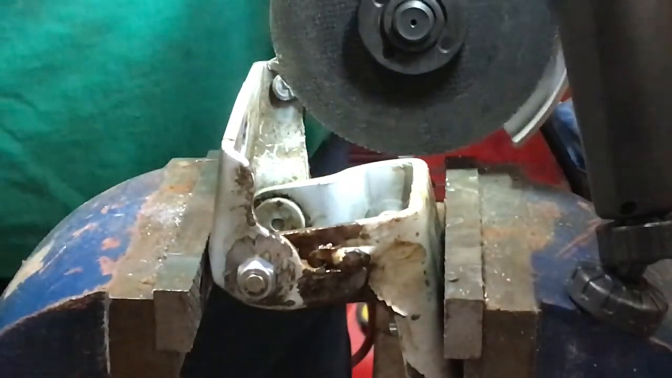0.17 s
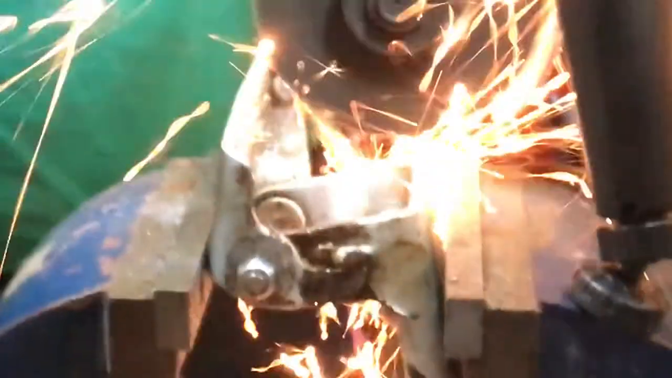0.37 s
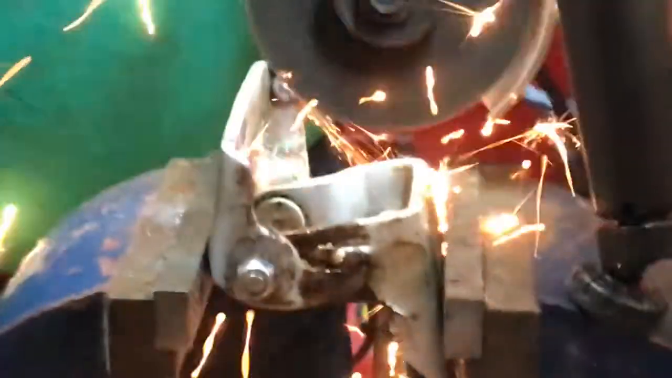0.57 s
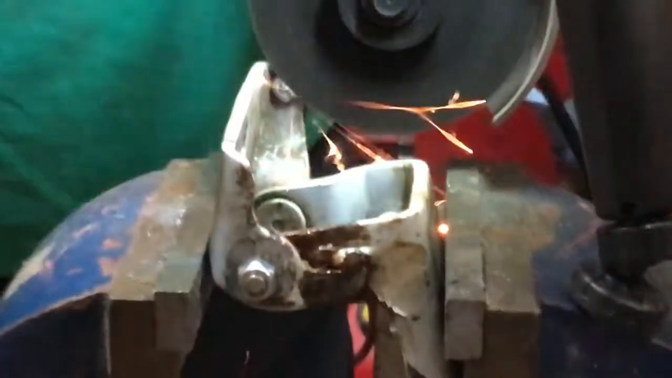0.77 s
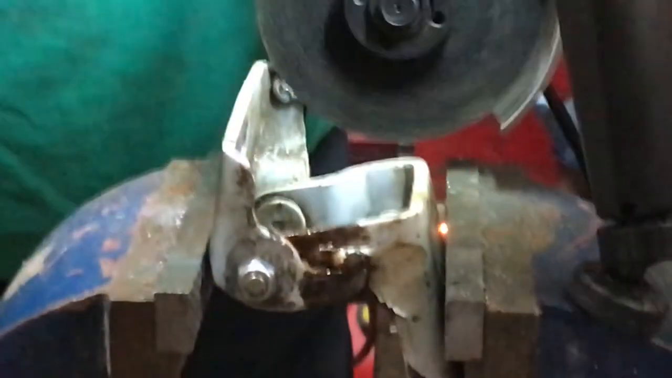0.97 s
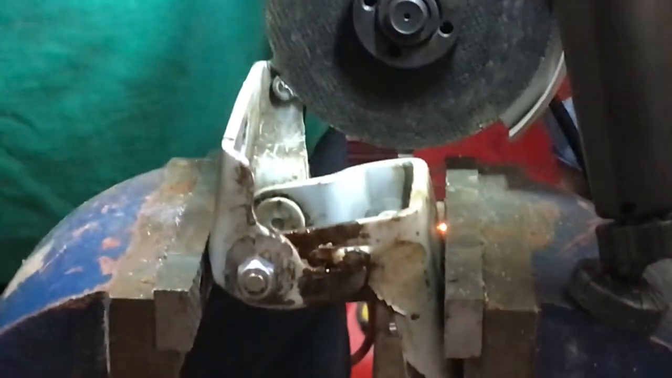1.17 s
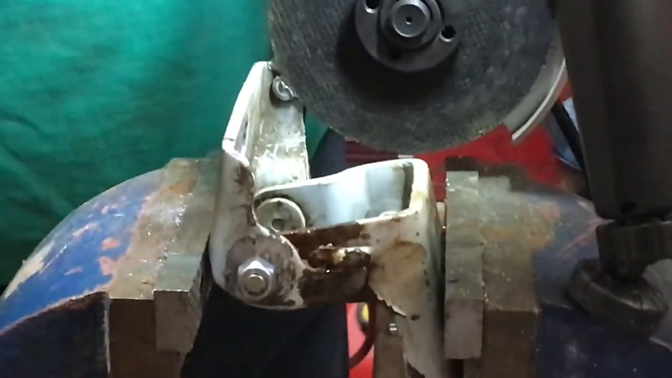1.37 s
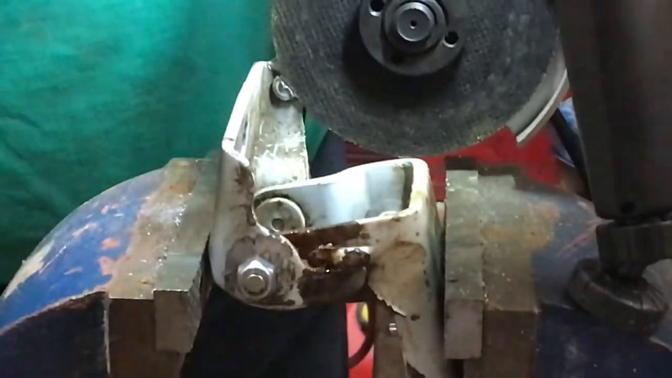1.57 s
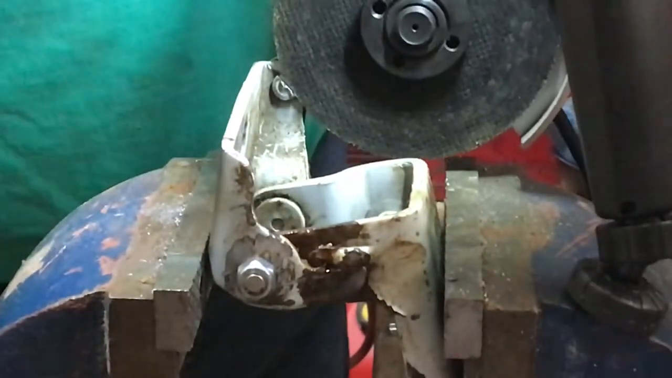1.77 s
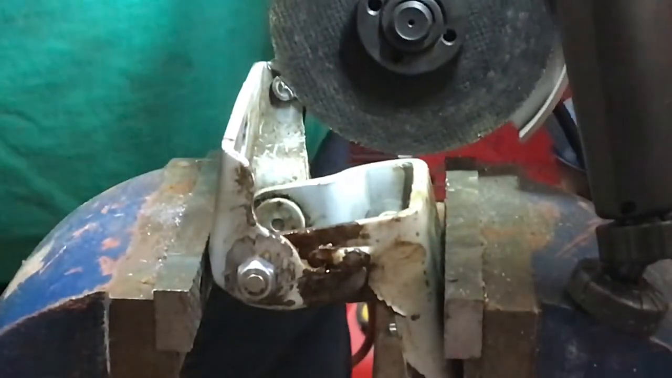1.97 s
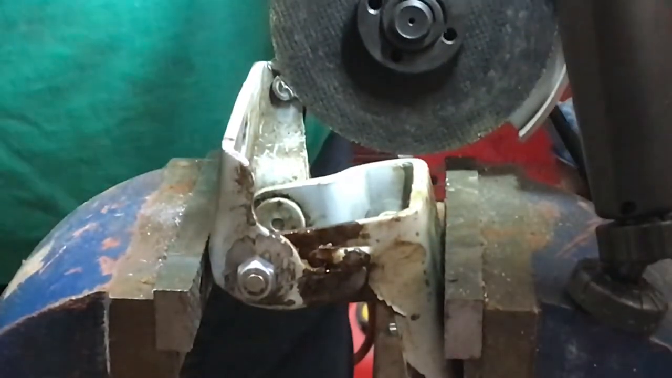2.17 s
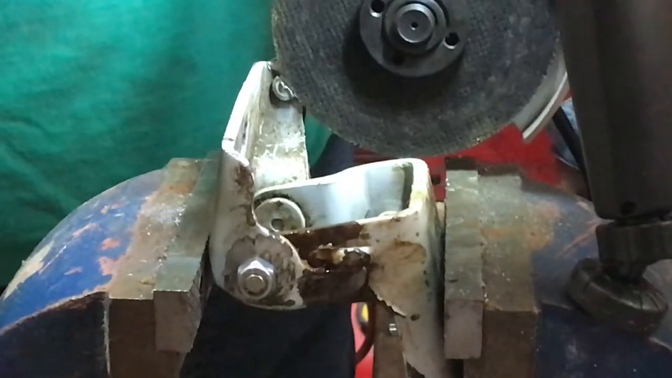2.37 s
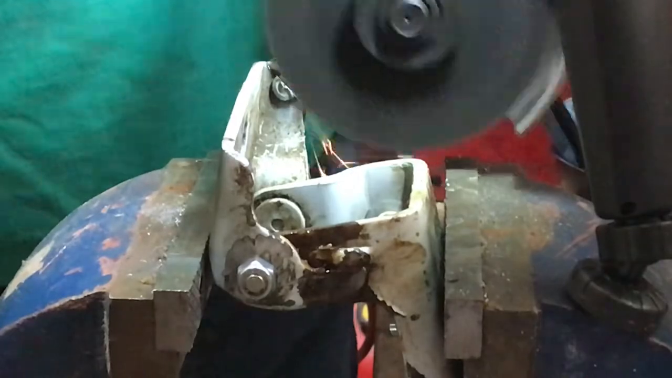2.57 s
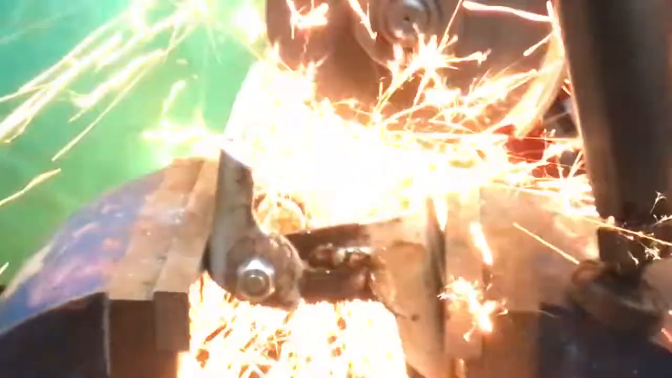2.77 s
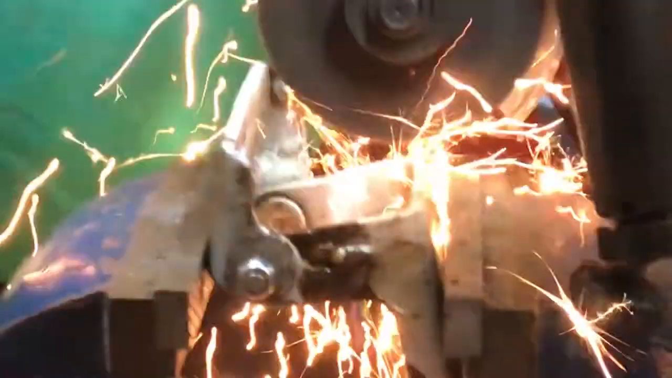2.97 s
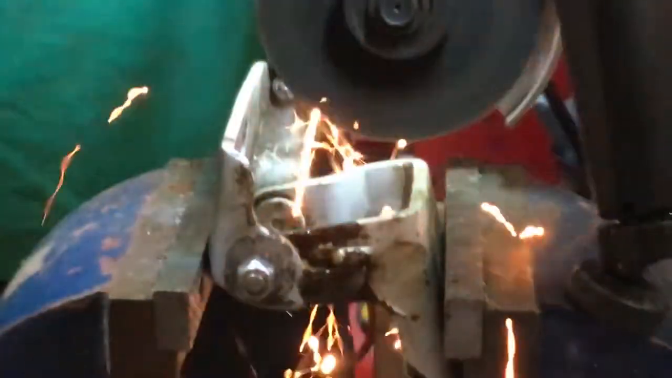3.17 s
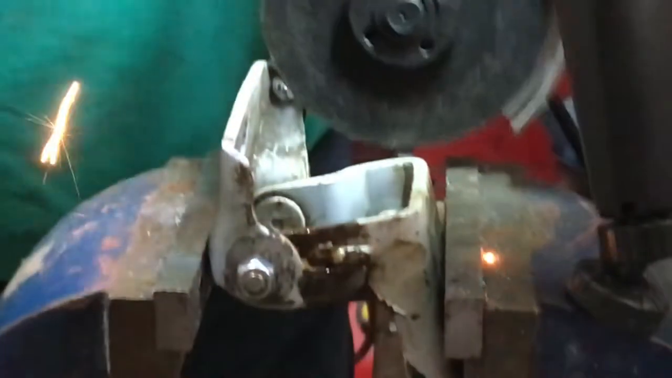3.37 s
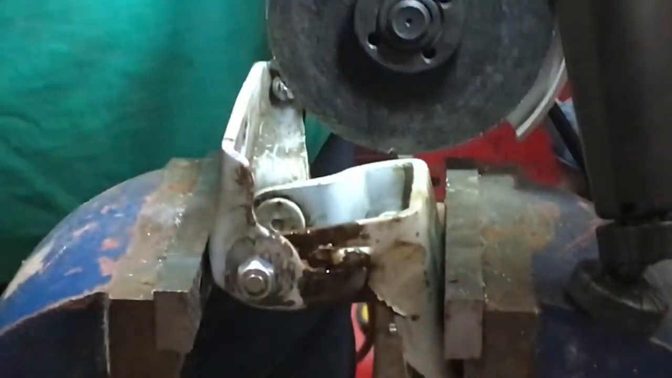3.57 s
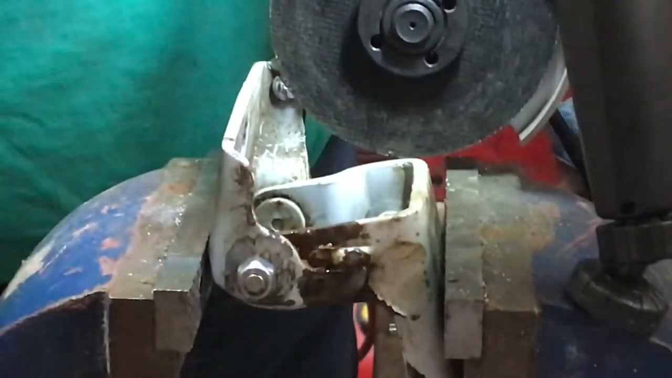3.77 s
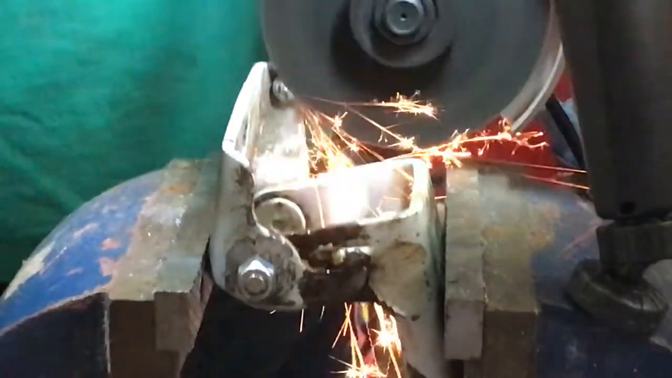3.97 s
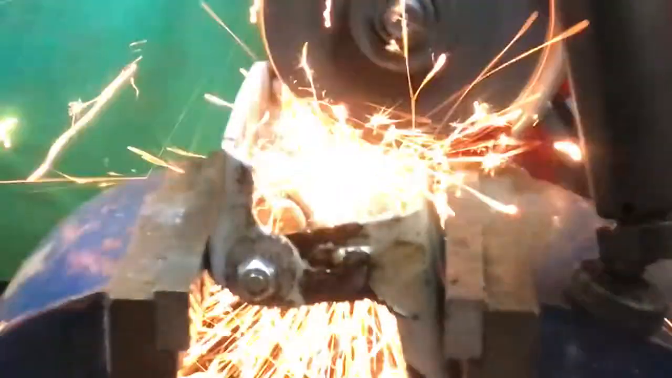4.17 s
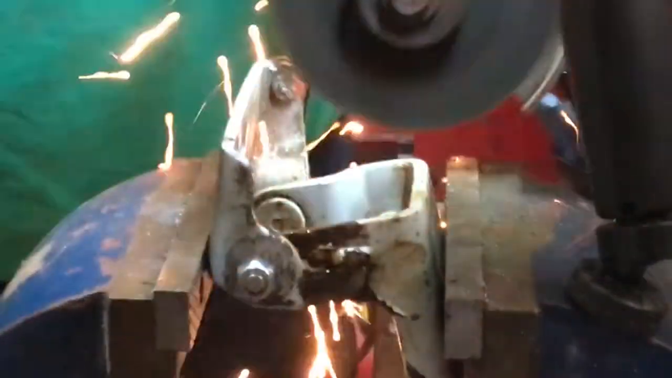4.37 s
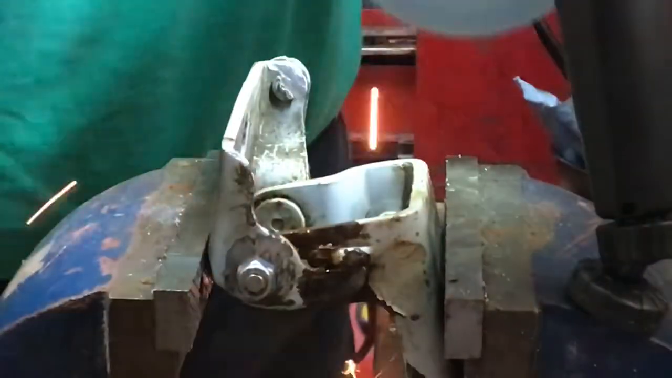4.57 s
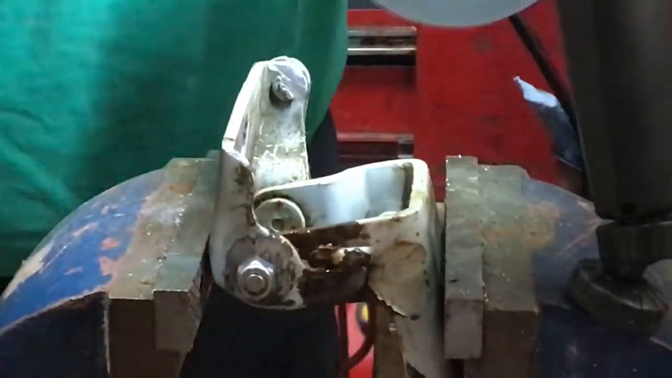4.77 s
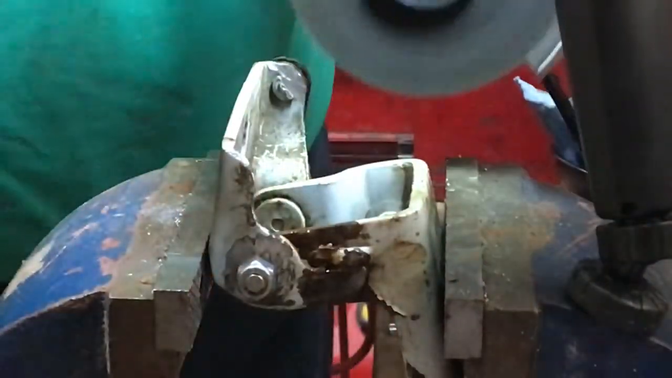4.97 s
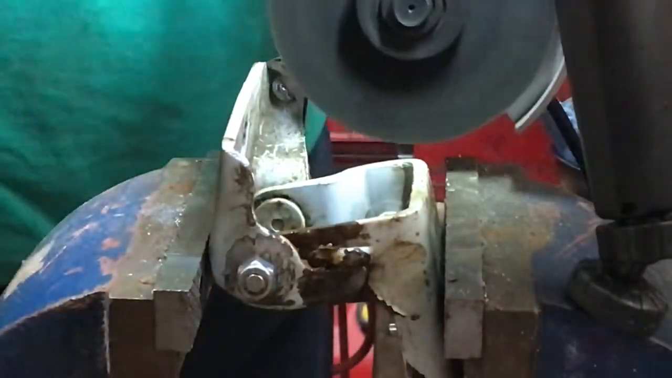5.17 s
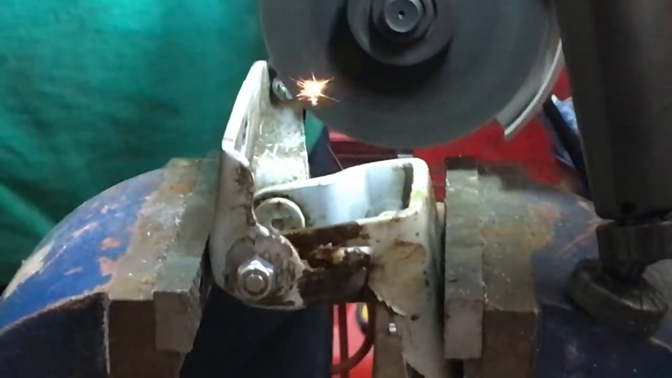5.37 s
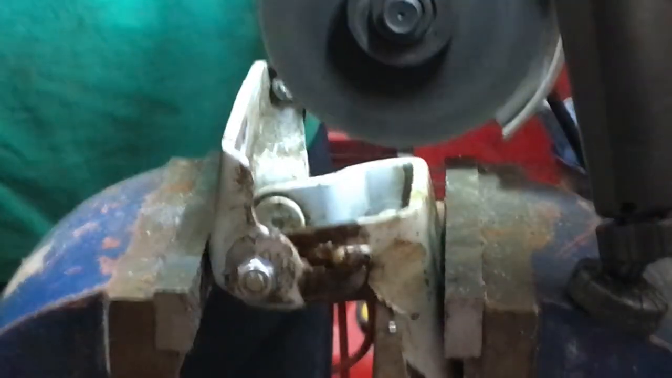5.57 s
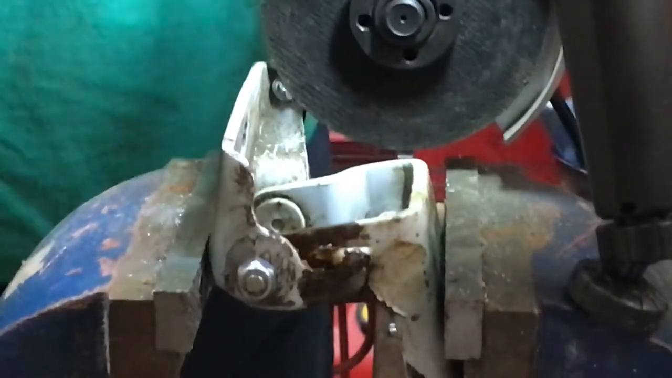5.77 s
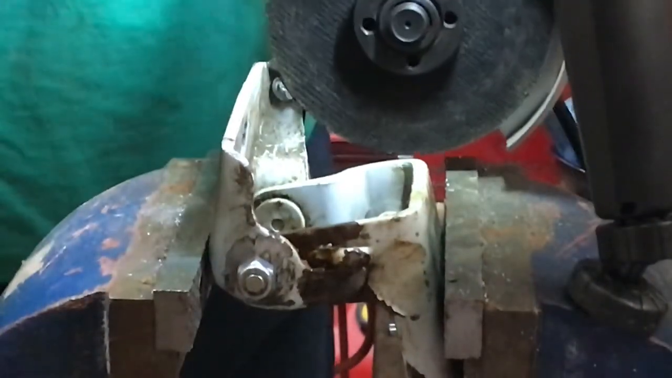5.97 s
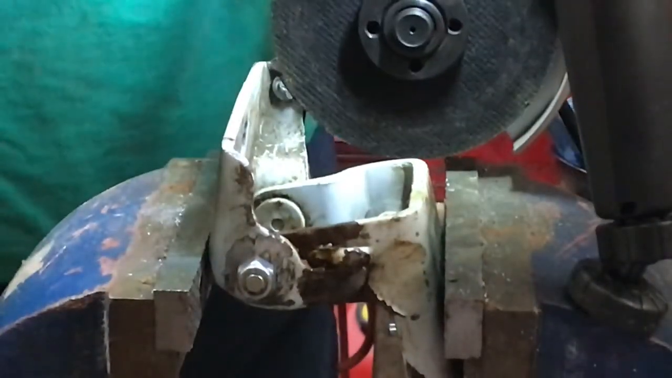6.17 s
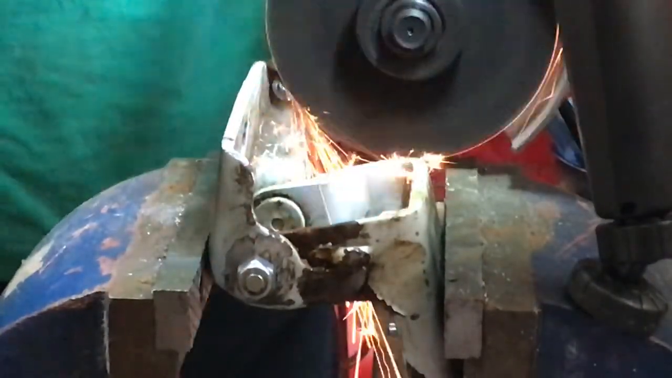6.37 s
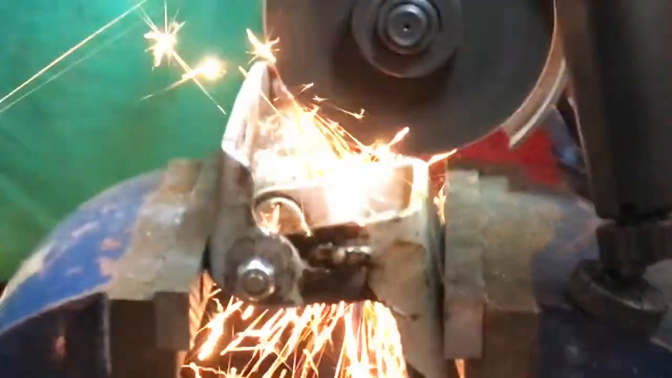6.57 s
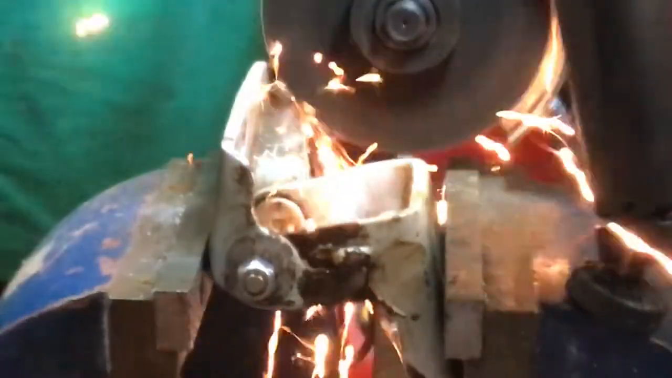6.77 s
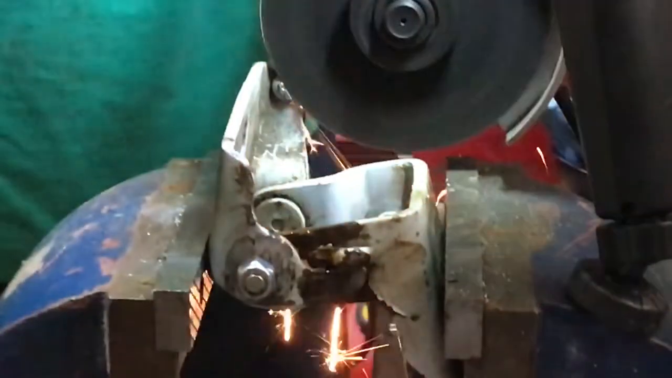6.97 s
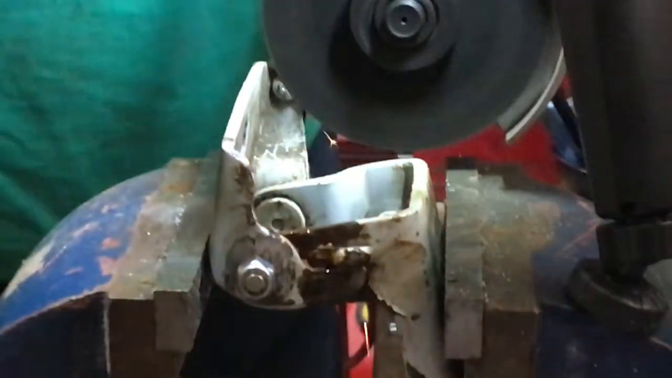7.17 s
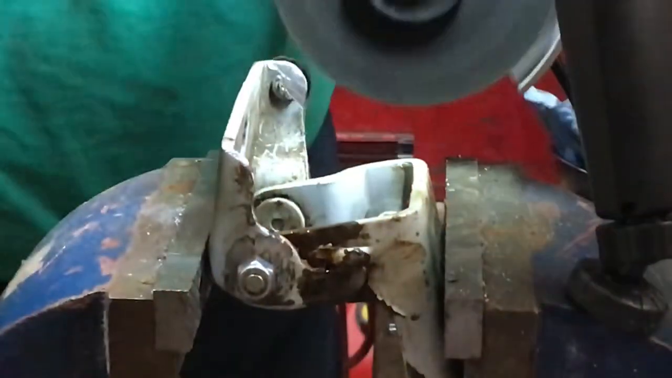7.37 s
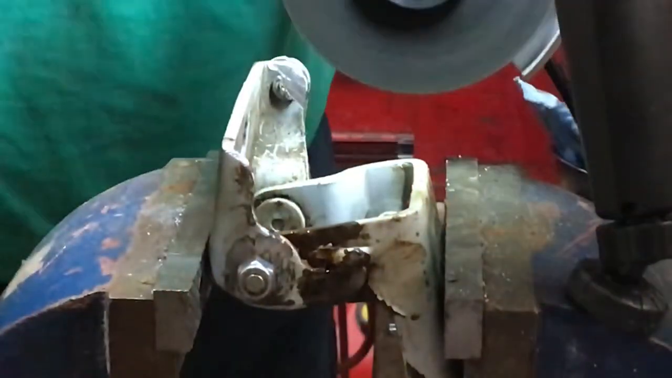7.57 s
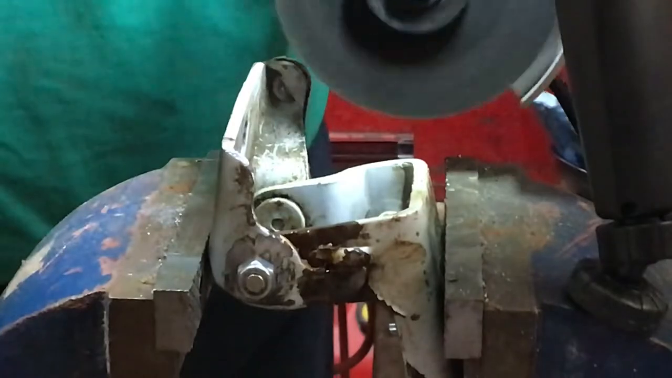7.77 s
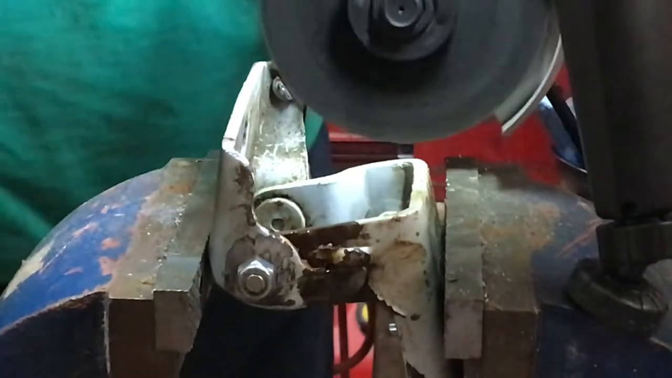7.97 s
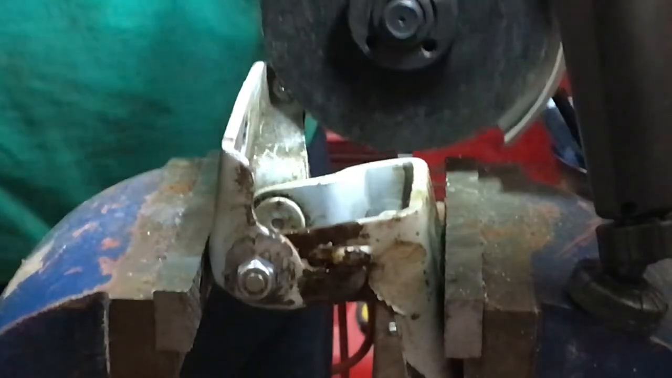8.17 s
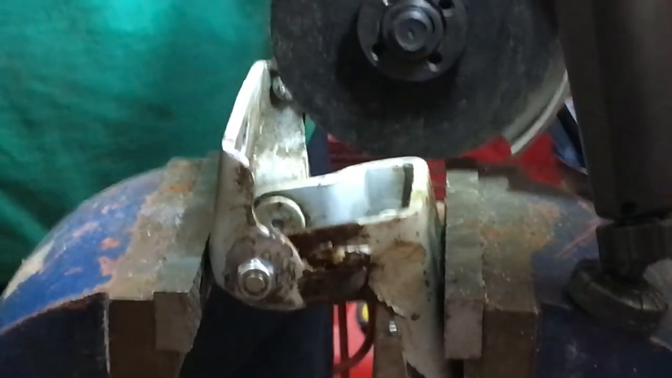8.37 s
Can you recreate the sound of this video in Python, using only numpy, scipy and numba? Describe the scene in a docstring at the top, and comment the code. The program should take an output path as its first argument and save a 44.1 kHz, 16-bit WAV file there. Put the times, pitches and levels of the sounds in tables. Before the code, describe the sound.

An angle grinder wheel rasps hard into a steel pin in short harsh bursts, each fading, with pauses, slowing whirr and rattling gears between.

```python
"""In a small workshop with mains hum, an angle grinder, pulled on briefly, meets a steel pin in a vice.
Grit strikes are filtered by wandering pin resonances, swell with each turn and fade through a push.
Lifted off, the slowing tool whirrs, hums and whines, and backlash in its gears excites the case.
Bites, bumps, ticks and thuds are shaped impulses; vice modes and a diffuse room tail ring on."""
import sys
import numpy as np
from scipy import signal
from scipy.fft import rfft, irfft
from scipy.io import wavfile
from scipy.ndimage import uniform_filter1d
from numba import njit

SR = 44100
rng = np.random.default_rng(int(sys.argv[2]) if len(sys.argv) > 2 else 0)


def dump(signal):
    """Clip the signal to [-1, 1] and save it as 16-bit WAV at the path in sys.argv[1]."""
    limited = np.clip(np.atleast_2d(signal).T, -1, 1)
    pcm = np.round(limited * 32767).astype(np.int16)
    wavfile.write(sys.argv[1], SR, pcm)


N = 370881

# wheel on steel: (touch [s], lift [s], level [dB], fade [dB/s], attack [ms],
#                  bench shake against the level [dB], low end [dB], release [dB/s])
PUSHES = [(0.216, 1.005, -7, 24.5, 17.3, -25.5, 1, 390), (2.594, 3.331, -8, 23, 6.5, -26, 1, 402),
          (3.96, 4.39, -7, 27.5, 18.6, -29.5, -1, 316), (5.298, 5.726, -20.5, -1.5, 8.7, -20.5, -1, 302),
          (6.365, 7.323, -8.5, 16.5, 12.6, -32, -2.5, 295)]
# free-running tool: (start [s], end [s], whirr level [dB], knock treble at the start [dB], low drone [dB])
COAST = [(4.425, 5.324, -36, -0.5, 2.5), (7.347, 8.037, -40.5, -7.5, -1)]
# smooth spectrum of the cut: (frequency [Hz], relative density [dB per Hz])
CUT_SPECTRUM = [(200, -38), (350, -27), (900, -21), (1700, -18.5), (3200, -7), (5000, -19), (7600, -22),
                (8700, -21), (15500, -26)]
# resonances of wheel, guard and gear case: (frequency [Hz], nominal width [Hz], level [dB])
TOOL_MODES = [(780, 170, -6), (1300, 90, -15), (2280, 260, -5), (2900, 200, -4), (3350, 220, -2),
              (4210, 40, -6), (4650, 220, -6), (5320, 200, -9), (8690, 250, -12), (10000, 350, -10)]
# resonances of the bench: (frequency [Hz], nominal width [Hz], level [dB])
BENCH_MODES = [(68.6, 21, 1), (122.5, 30, 2), (545, 250, -5.5)]


def grinding(t, turn, bite):
    """Amplitude modulation by rotation: the wheel's high spot varies the cut and shakes the bench."""
    uneven_db = 2
    push, shaking, low_db = pressure(t)
    high_spot = np.cos(turn) + 0.82 * np.cos(2 * turn + 1.) + 0.53 * walk(150)
    strength = undb(uneven_db * high_spot + 1.5 * walk(30)) * push
    force = grit(2.38) * strength + undb(-3.5) * bite
    sound = steel(t, force)
    shake = (np.cos(turn) + 10.0 * rng.standard_normal(N)) * undb(4.0 * walk(21)) * shaking
    # the low end comes in lumps
    growl = band(sound, 360, 1100) * undb(2.4 * walk(14) + low_db)
    # lighter contact is duller
    push_db = np.maximum(20 * np.log10(push), -30)
    treble = band(sound, 5500, 15040) * undb(0.18 * push_db + 5.0)
    bench = resonate(shake + undb(-27.0) * bite, BENCH_MODES)
    return growl + band(sound, 1100, 6360) + treble + bench


def pressure(t):
    """Contact-force envelopes of cut, shake and low end: quick touch, hold, steady decay, quick lift."""
    # the hand eases off: (time [s], depth [dB], half length to 1/e [ms])
    eases = [(0.428, 3.5, 30), (0.97, 4.5, 73), (4.163, 4.5, 30), (4.268, 5.5, 8.6), (7.28, 4, 21)]
    hold_s = 0.12
    eased_db = sum(depth_db * np.exp(-(1000 * (t - s) / half_ms) ** 2) for s, depth_db, half_ms in eases)
    push, shake, low_db = np.full(N, 1e-6), 0, 0
    for touch, lift, db, fade, ms, shake_db, growl_db, release in PUSHES:
        fading_db = fade * np.maximum(t - touch - hold_s, 0)
        released_db = release * np.maximum(t - lift, 0)
        attack = np.clip(1000 * (t - touch) / ms, 0, 1) ** 2
        one = attack * undb(db - fading_db - released_db - eased_db)
        push = push + one
        shake = shake + undb(shake_db) * one
        low_db = np.where(t >= touch, growl_db, low_db)
    return push, shake, low_db


def wheel(t):
    """Rotational drag: each pull sets a speed, which decays exponentially, faster on the steel."""
    # trigger pulls: (time [s], starting wheel speed [turns/s])
    pulls = [(0.224, 103), (2.599, 109), (3.97, 84), (6.373, 80)]
    free_drag, contact_drag = 0.727, 0.277  # rate of relative speed loss [1/s]
    drag = free_drag + contact_drag * sum(within(t, a, b) for a, b, *_ in PUSHES)
    lost, hz = np.cumsum(drag) / SR, np.zeros(N)
    for s, start_hz in pulls:
        hz = np.where(t >= s, start_hz * np.exp(lost[int(s * SR)] - lost), hz)
    return 2 * np.pi * np.cumsum(hz) / SR


def grit(spread_db):
    """Impulsive noise: grains strike every sample, and a few are much larger."""
    return unit(rng.standard_normal(N) * undb(spread_db * rng.exponential(size=N)))


def bites():
    """Contact force of short scrapes: noise that builds up over a few grains, then decays."""
    # wheel bites the steel: (time [s], level [dB], rise [ms])
    scrapes = [(5.295, -11, 0.46), (5.305, -3.5, 7.4), (5.342, -11.5, 5), (5.358, -5.5, 4.7),
               (5.366, 5, 0.45), (5.4004, 5, 1.9), (5.44, -16.5, .3), (5.454, -4, 5.9), (5.499, -3.5, 1.6),
               (5.508, 1, 2.6), (5.53, 0, 3.8), (5.563, -2.5, 1), (5.5704, 0, 0.56), (5.636, -8.5, 2),
               (5.6651, -7, 0.43), (5.697, -5, 0.35), (5.711, -14, .3), (7.006, -4.5, 0.28),
               (7.1562, -1, 1.2), (7.3118, -2.5, 2.1)]
    s, level_db, rise_ms = np.transpose(scrapes)
    return bursts(s, level_db, np.full(len(s), 3.94), rise_ms)


def steel(t, force):
    """Modal resonance under moving contact: each mode swells, fades and bends alone."""
    # pin, bracket and wheel in contact: (frequency [Hz], nominal width [Hz], level [dB])
    pin_modes = [(960, 31, -9.5), (1240, 9.9, -20), (1587, 32, -12), (1955, 39, -7), (2362, 180, -2),
                 (2760, 48, -6.5), (2960, 130, 2), (3255, 33, -2.5), (3302, 350, -3.5), (3820, 48, -8),
                 (5460, 110, -17), (8600, 700, -12), (9500, 700, -17)]
    # one resonance sings out: (time [s], frequency [Hz], half length to 1/e [ms], level [dB])
    squeals = [(0.37, 2253, 60, 8), (0.86, 1950, 81, 9), (2.77, 3230, 65, 11.5), (2.839, 980, 58, -0.5),
               (4.08, 2275, 50, 9), (6.395, 2020, 51, 5.5), (7.0, 3490, 78, 13.5)]
    drift, drift_per_s = 0.014, 9  # relative bend of each resonance, its rate of change [1/s]
    squeal_width_hz = 45.
    out = undb(-3.5) * through(force, response(CUT_SPECTRUM))
    for hz, width, db in pin_modes:
        bent = hz * (1 + drift * uniform_filter1d(walk(drift_per_s), size=2000))
        driven = force * undb(7.5 + db + 3.2 * walk(20))
        once = sweep(driven, bent, 1.77 * width)
        out = out + sweep(once, bent, 1.77 * width)
    for s, hz, half_ms, db in squeals:
        swell = undb(db) * np.exp(-(1000 * (t - s) / half_ms) ** 2) + 1e-9
        out = out + sweep(force * swell, np.full(N, 1. * hz), squeal_width_hz)
    return out


@njit
def sweep(x, hz, width):
    """State-variable band-pass: its centre moves every sample, with gain 1 at the centre."""
    y, band_state, low_state = np.empty(len(x)), 0., 0.
    for i in range(len(x)):
        g, damping = np.tan(np.pi * hz[i] / SR), width / hz[i]
        v = (band_state + g * (x[i] - low_state)) / (1 + g * (g + damping))
        band_state = 2 * v - band_state
        low_state = low_state + 2 * g * v
        y[i] = damping * v
    return y


def coasting(t, turn):
    """Rotating-machine noise: broadband whirr, singing bearings, armature harmonics, backlash impacts."""
    # smooth spectrum of the whirr: (frequency [Hz], relative density [dB per Hz])
    whirr_spectrum = [(35, -55.5), (60, -34.5), (738, -1.5), (1050, -6), (1260, 5.5), (1960, -3.5),
                      (3190, 5), (15500, -20)]
    # bands that sing in the whirr: (frequency [Hz], nominal width [Hz], level [dB])
    bearing_modes = [(4210, 16, -8), (4650, 45, -19)]
    # singing in each free run: (level [dB], one per run)
    bearing_db = (-1, -9)
    # clear knocks of gear backlash: (time [s], level [dB])
    clear_knocks = [(4.521, -17), (4.5778, -9.5), (4.595, -18.5), (4.645, -19.5), (4.692, -33),
                    (4.7179, -8), (4.7465, -8), (4.7696, -8.5), (4.803, -8), (4.874, -5), (4.9567, -5),
                    (5.034, -5.5), (5.0572, -8.5), (5.085, -2.5), (5.149, -5), (5.187, -12.5), (5.2096, -6),
                    (5.241, -13.5), (7.3814, -14), (7.431, -9.5), (7.4774, -7), (7.5222, -10.5),
                    (7.534, -10), (7.563, -14), (7.594, -11), (7.621, -18), (7.6945, -20), (7.7698, -23),
                    (7.8038, -17), (8.003, -31), (7.648, -17), (7.663, -10), (7.715, -17), (7.7403, -11.5),
                    (7.791, -15.5), (7.8224, -14), (7.8382, -16), (7.871, -24), (7.904, -18.5),
                    (7.9484, -27)]
    gearing, bars = 3.5, 24  # armature turns per wheel turn, bars on the armature
    rise_s, dulling_db_per_s = 0.11, 8

    running = sum(within(t, a, b) * np.clip((t - a) / rise_s, .3, 1) * undb(db) for a, b, db, *_ in COAST)
    drone = sum(within(t, a, b) * undb(db) for a, b, *_, db in COAST)
    sing = sum(within(t, a, b) * undb(db) for (a, b, *_), db in zip(COAST, bearing_db))
    treble = sum(within(t, a, b) * undb(db - dulling_db_per_s * (t - a)) for a, b, _, db, *_ in COAST)

    air = grit(1.2) * undb(2.2 * walk(90))
    whirr = through(air, response(whirr_spectrum, TOOL_MODES, between_db=-2.5))
    whirr = drone * band(whirr, 40, 1350) + band(whirr, 1150, 12700)
    singing = sing * undb(20) * resonate(rng.standard_normal(N), bearing_modes, wander_db=3.0, rate=6)
    armature = undb(-24) * (np.cos(gearing * turn) + 1.4 * np.cos(2 * gearing * turn))
    # the case passes the whine only while it sweeps through its loud range
    bar_whine = undb(1 + 5.0 * walk(150)) * np.cos(bars * gearing * turn)
    whine = band(bar_whine, 2600, 3400)

    # 45 faint knocks at random in each run
    chance = rng.random((len(COAST), 45, 2))
    faint_knocks = [(a + (b - a) * when, -23 + 9.0 * (size - .5))
                    for (a, b, *_), rows in zip(COAST, chance) for when, size in rows]
    s, level_db = np.transpose(clear_knocks + faint_knocks)
    lengths_ms = 3.8 * undb(2.4 * rng.standard_normal(len(s)))
    blows = bursts(s, level_db, lengths_ms)
    knocks = through(blows, response(CUT_SPECTRUM, TOOL_MODES, between_db=1))
    knocks = band(knocks, 1260, 5300) + treble * band(knocks, 7000, 11900)
    return (whirr + singing + armature + whine) * running + undb(-5.5) * knocks


def bumps():
    """Impact excitation: dull blows ring the gear case and, lower, the bracket."""
    # the slowing tool bumps the part as it is set down:
    # (time [s], level [dB], body against that level [dB])
    blows = [(8.024, -19.5, -24), (8.035, -9.5, -17), (8.0493, -14, -9), (8.0614, -1.5, -15),
             (8.0793, -13, -3), (8.2774, -28, -11), (8.288, -23.5, -12), (8.305, -17, 3.5),
             (8.315, -25, -14)]
    s, level_db, body_db = np.transpose(blows)
    ms = np.full(len(s), 6.3)
    force = bursts(s, level_db, ms, rise_ms=0.57)
    case = through(force, response(CUT_SPECTRUM, TOOL_MODES, between_db=13.0))
    body = bursts(s, level_db + body_db, 2 * ms, rise_ms=0.61)
    return band(case, 1570, 3800) + undb(-8) * band(case, 3700, 16500) + band(body, 336, 970)


def thuds():
    """Impulse response to soft blows: a smooth push of 7.6 ms sets the bench booming."""
    # the tool settles on the bench: (time [s], peak force [dB])
    blows = [(8.081, -41), (8.325, -43.5)]
    force, push = np.zeros(N), np.hanning(int(0.0076 * SR))
    for s, db in blows:
        force[int(s * SR):int(s * SR) + len(push)] = undb(db) * push
    return force / 2 + 8.9 * resonate(force, BENCH_MODES)


def ticks():
    """Band-limited transients: each tick is a decaying noise puff around its own centre."""
    # small ticks of hands and tool: (time [s], peak [dB], centre [Hz], decay time [ms])
    tick_list = [(1.202, -38, 2400, 32), (1.550, -51, 3175, 5.7), (1.757, -45.5, 165, 29),
                 (2.0167, -47, 1930, 5.2), (2.037, -41.5, 2870, 13), (2.11, -51.5, 2000, 30),
                 (2.067, -35.5, 1980, 11.5), (2.383, -38, 2810, 14), (3.632, -39, 2820, 9.5),
                 (3.752, -44, 2340, 14), (3.94, -44, 2710, 19)]
    out, t = np.zeros(N), np.arange(SR // 5) / SR
    for (s, db, hz, ms), noise in zip(tick_list, rng.standard_normal((len(tick_list), len(t)))):
        puff = band(noise * np.exp(-1000 * t / ms), .45 * hz, 1.9 * hz)
        out[int(s * SR):int(s * SR) + len(t)] += undb(db) * puff / np.abs(puff).max()
    return out


def ringing(x):
    """Free decay of long vice modes, driven by the cut and kicked as the vice springs back."""
    # modes of the vice: (frequency [Hz], level [dB], 60 dB decay time [s])
    vice_modes = [(619, -65.5, 2.3), (470, -80, 1.8), (1950, -70, .9), (2929, -76, 1.1)]
    t, kicks = np.arange(3 * SR // 2) / SR, np.zeros(N)
    # a kick at each lift that no free run follows
    lifts = [lift for _, lift, *_ in PUSHES if all(abs(a - lift) > .1 for a, *_ in COAST)]
    kicks[[int(lift * SR) for lift in lifts]] = undb(12.5)
    modes = sum(undb(db) * np.sin(2 * np.pi * hz * t) * 1000 ** (-t / t60) for hz, db, t60 in vice_modes)
    return through(0.3 * x + kicks, modes)


def room(x):
    """Reverberation: quick early decay, then a diffuse tail whose spectral extremes die sooner."""
    t60_s, early_t60_s = 0.92, 0.25
    t = np.arange(SR) / SR
    noise = rng.standard_normal(SR)
    dull = band(noise, 150, 8900)
    late = dull * 1000 ** (-t / t60_s) + 2.1 * (noise - dull) * 1000 ** (-t / (0.55 * t60_s))
    tail = undb(-6) * late + dull * 1000 ** (-t / early_t60_s)
    tail *= np.clip(t / 0.0075, 0, 1)  # reflections build up over 7.5 ms
    return undb(-17) * through(x, tail / np.sqrt(np.sum(tail ** 2)))


def workshop():
    """Stationary background: wavering mains harmonics over filtered room noise."""
    # mains hum: (frequency [Hz], level [dB rms])
    hum_tones = [(59.2, -68), (118.4, -68.5)]
    # spectrum of the room noise: (frequency [Hz], relative density [dB per Hz])
    noise_spectrum = [(25, -17.5), (60, -10), (122, -13.5), (200, -23.5), (457, -26.5), (1500, -35),
                      (4260, -38), (15500, -47.5)]
    t = np.arange(N) / SR
    hum = sum(np.sqrt(2) * undb(db + 1.4 * walk(3.2)) * np.sin(2 * np.pi * hz * t) for hz, db in hum_tones)
    return hum + undb(-61) * through(rng.standard_normal(N), response(noise_spectrum))


def undb(db):
    """Logarithmic level: decibels to an amplitude ratio."""
    return 10 ** (np.asarray(db) / 20)


def unit(x):
    """Normalisation to a root-mean-square of 1."""
    return x / np.sqrt(np.mean(x ** 2))


def response(points, modes=(), between_db=0, size=8192):
    """Minimum phase: a causal response of unit energy from a smooth spectrum plus resonances."""
    hz = np.maximum(np.fft.rfftfreq(size, 1 / SR), 1)
    p = np.array(points, float)
    power = undb(2 * (np.interp(np.log(hz), np.log(p[:, 0]), p[:, 1]) + between_db))
    for f, width, db in modes:
        power = power + undb(2 * db) / (1 + (2 * (hz - f) / width) ** 2) ** 2
    # folding the cepstrum makes the response causal
    cepstrum = irfft(np.log(power) / 2)
    cepstrum[1:size // 2] *= 2
    cepstrum[size // 2 + 1:] = 0
    h = irfft(np.exp(rfft(cepstrum)))[:size // 2]
    return h / np.sqrt(np.sum(h ** 2))


def through(x, h):
    """Linear filtering: convolution with an impulse response."""
    return signal.oaconvolve(x, h)[:N]


def band(x, lo_hz, hi_hz):
    """Band-pass filtering of Butterworth type."""
    edges = [lo_hz, min(hi_hz, .45 * SR)]
    return signal.sosfilt(signal.butter(3, edges, "bandpass", fs=SR, output="sos"), x)


def resonate(x, modes, wander_db=0., rate=12):
    """Modal superposition: steep resonances (two poles, twice), each with its own wandering drive."""
    out = 0
    for hz, width, db in modes:
        section = np.concatenate(signal.iirpeak(hz, hz / (1.6 * width), fs=SR))
        driven = x * undb(db + wander_db * walk(rate))
        out = out + signal.sosfilt([section, section], driven)
    return out


def walk(rate):
    """Slow random modulation: levels drawn every 1 / rate s and slewed, with a spread near 1."""
    k = int(SR / rate)
    return 1.2 * uniform_filter1d(np.repeat(rng.standard_normal(N // k + 1), k), k)[:N]


def bursts(times, levels_db, lengths_ms, rise_ms=0.15):
    """Transient envelopes: noise puffs with a quick start and an exponential decay."""
    out, ms_in = np.zeros(N + SR), 1000 * np.arange(SR // 8) / SR
    noise = rng.standard_normal((len(times), len(ms_in)))
    rises = np.broadcast_to(rise_ms, len(times))
    for s, db, ms, rise, puff in zip(times, levels_db, lengths_ms, rises, noise):
        start = 1 - np.exp(-ms_in / max(rise, .1))
        decay = np.exp(-np.maximum(ms_in - rise, 0) / max(ms, .2))
        out[int(s * SR):int(s * SR) + len(puff)] += undb(db) * puff * start * decay
    return out[:N]


def within(t, start, end):
    """Time window: a gate with soft edges."""
    return uniform_filter1d(((t >= start) & (t < end)) * 1., size=256)


def scene():
    """Superposition of the direct sources, the vice, the room's reflections and the background."""
    t = np.arange(N) / SR
    turn = wheel(t)  # wheel angle [rad]
    contact = grinding(t, turn, bites())
    near = contact + bumps() + thuds() + coasting(t, turn) + ticks()
    return (near + ringing(contact) + room(near) + workshop())[None]


def record(dry):
    """Soft saturation and low-pass filtering: a phone rounds the loudest peaks and cuts the top."""
    rounded = 0.87 * np.tanh(dry / 0.87)
    return signal.sosfilt(signal.ellip(16, .2, 110, 15800, fs=SR, output="sos"), rounded)


dry = scene()
out = record(dry)
dump(out)
```